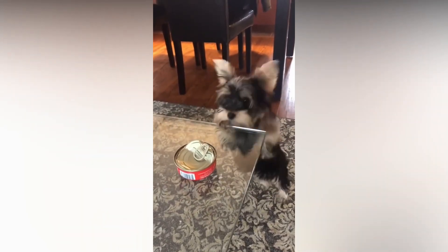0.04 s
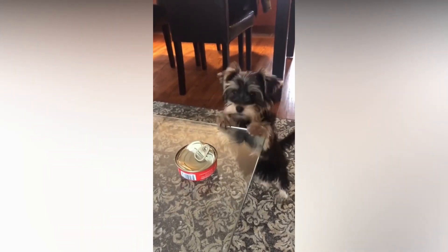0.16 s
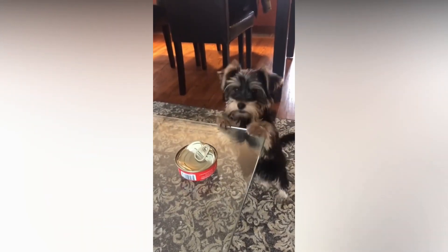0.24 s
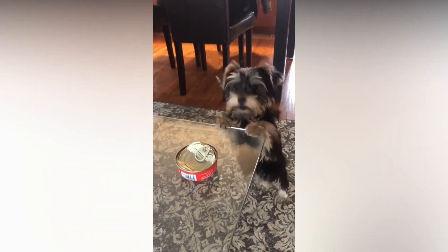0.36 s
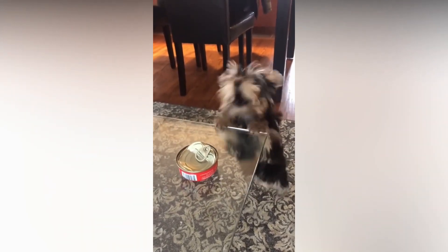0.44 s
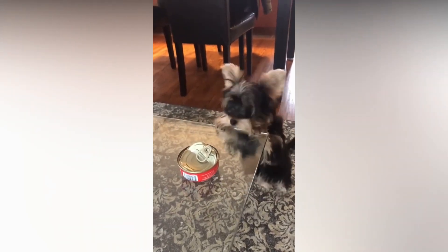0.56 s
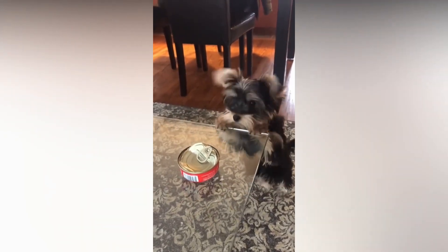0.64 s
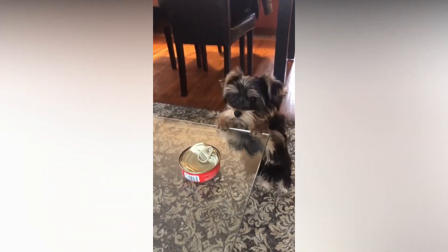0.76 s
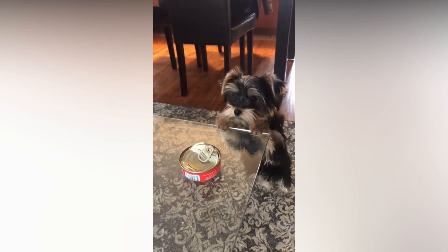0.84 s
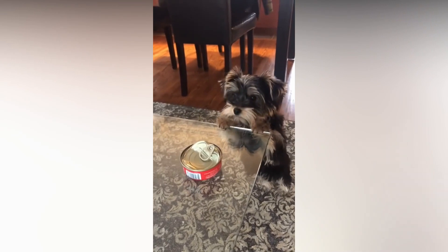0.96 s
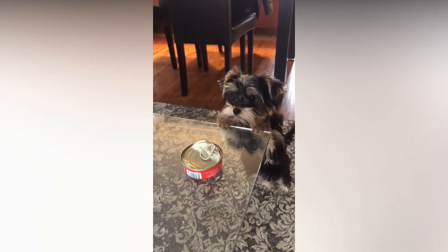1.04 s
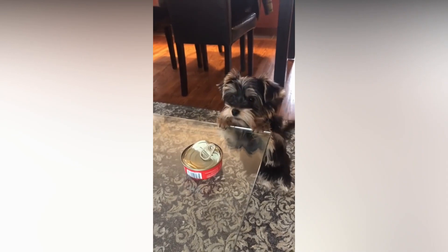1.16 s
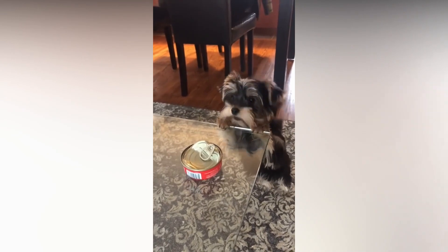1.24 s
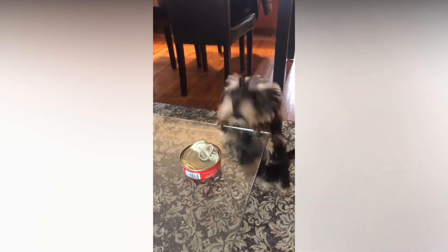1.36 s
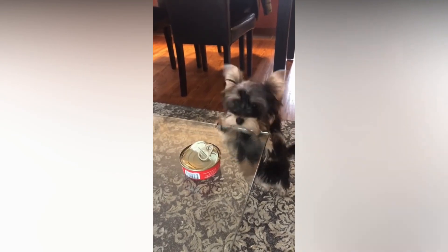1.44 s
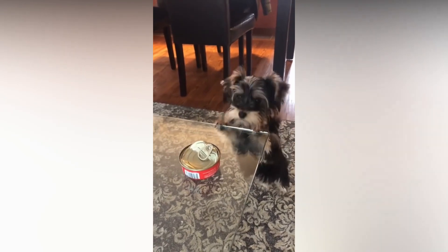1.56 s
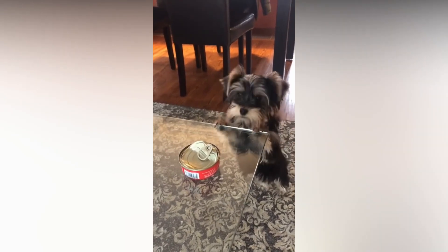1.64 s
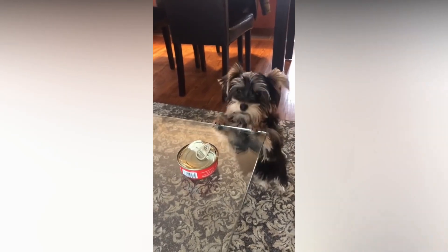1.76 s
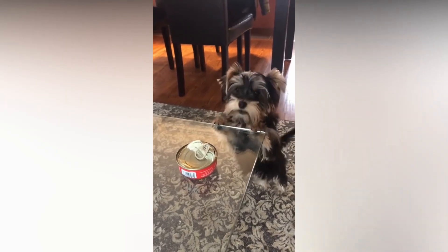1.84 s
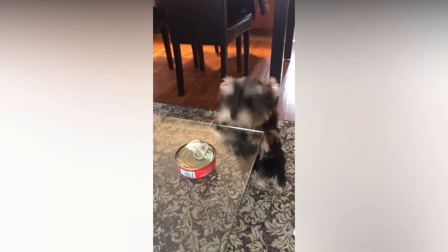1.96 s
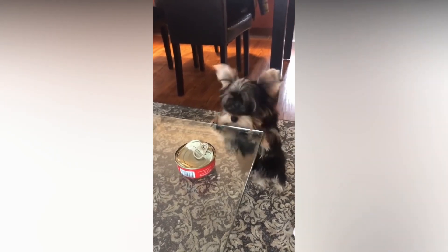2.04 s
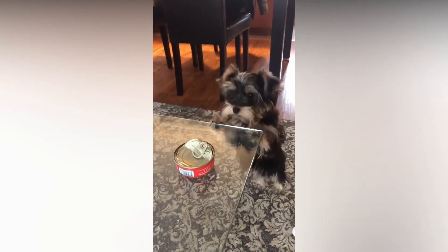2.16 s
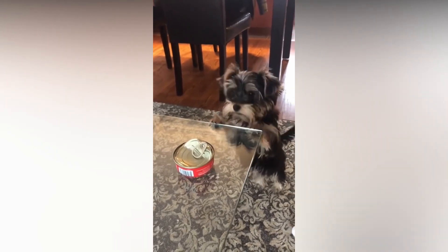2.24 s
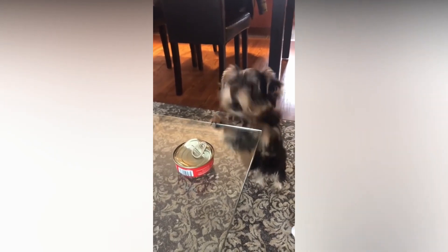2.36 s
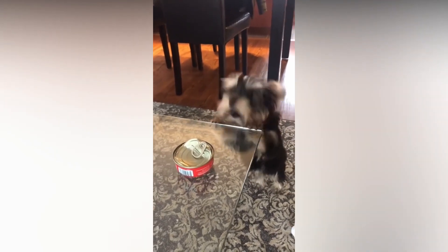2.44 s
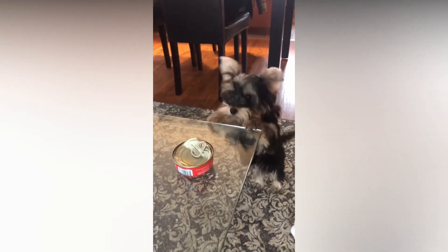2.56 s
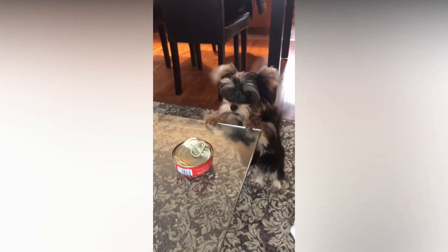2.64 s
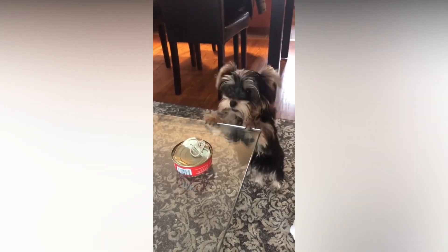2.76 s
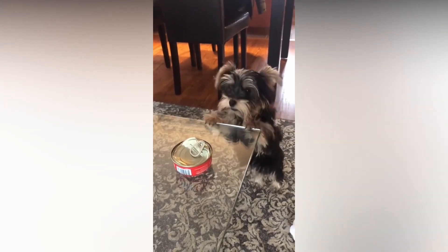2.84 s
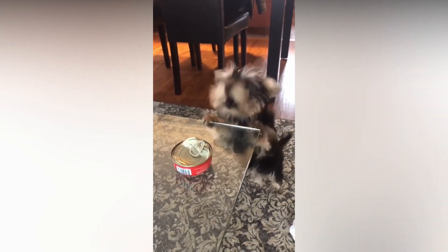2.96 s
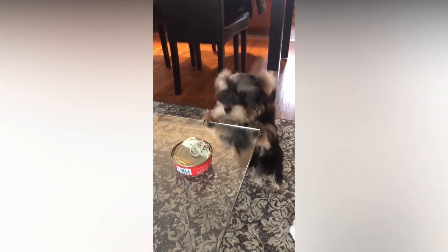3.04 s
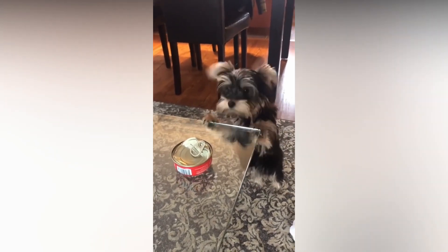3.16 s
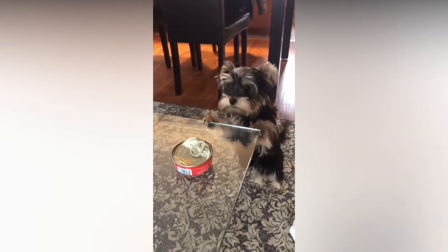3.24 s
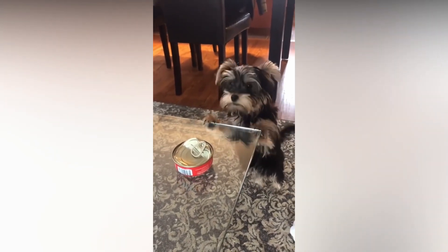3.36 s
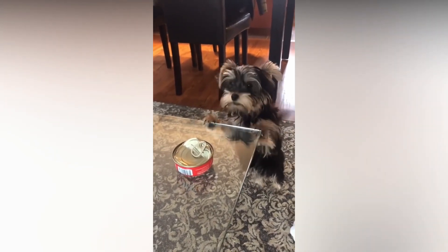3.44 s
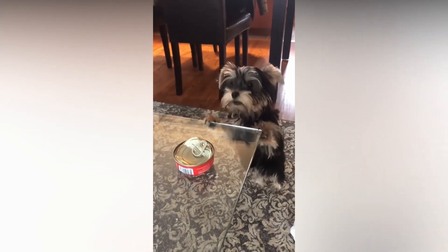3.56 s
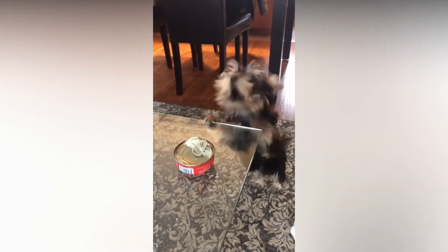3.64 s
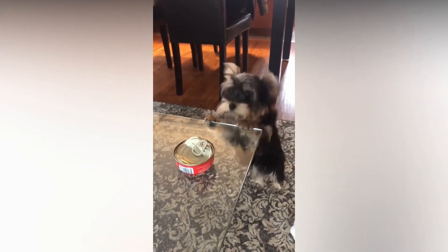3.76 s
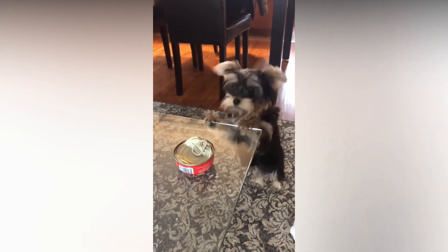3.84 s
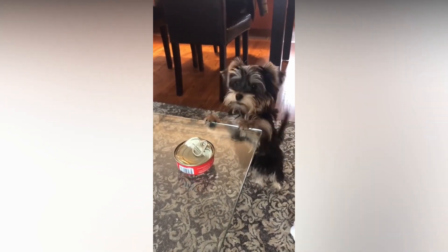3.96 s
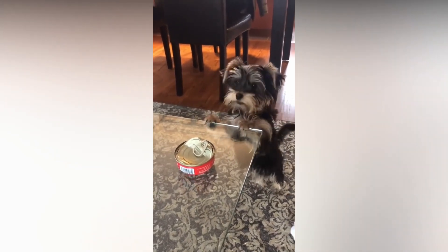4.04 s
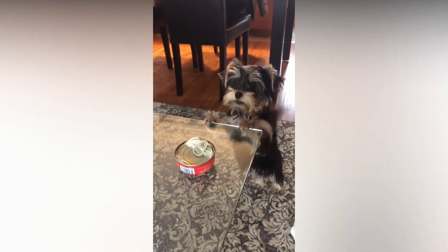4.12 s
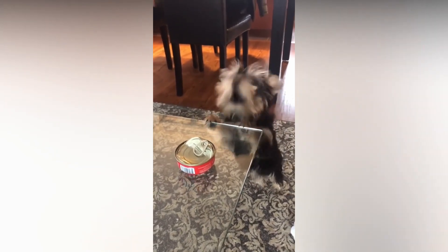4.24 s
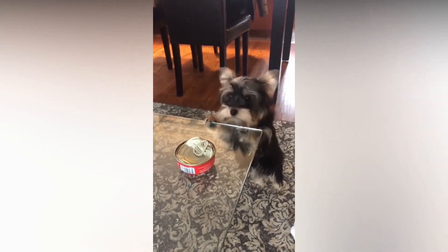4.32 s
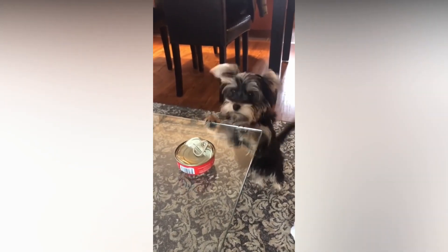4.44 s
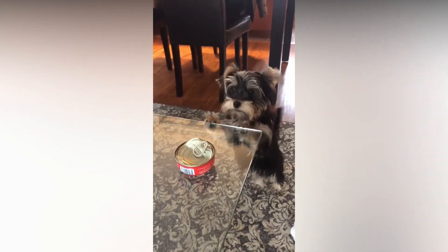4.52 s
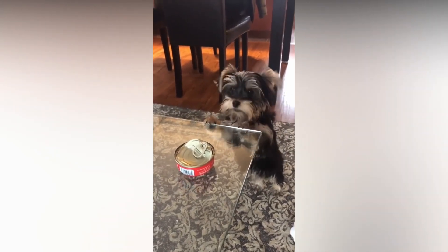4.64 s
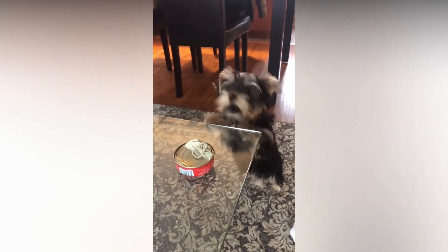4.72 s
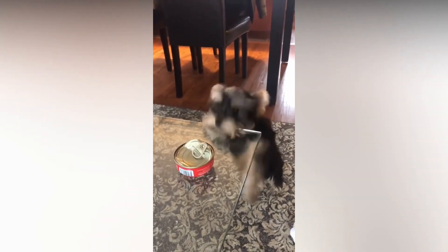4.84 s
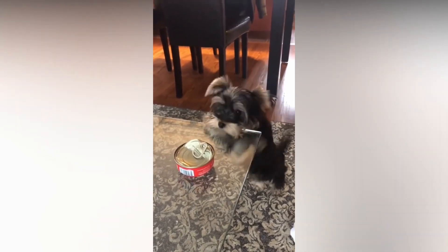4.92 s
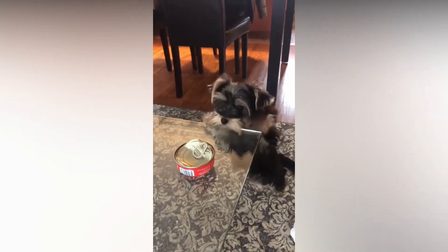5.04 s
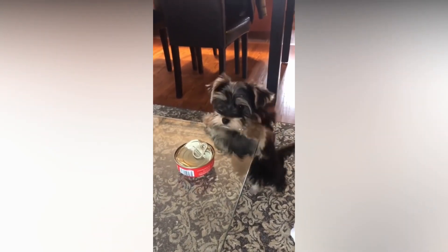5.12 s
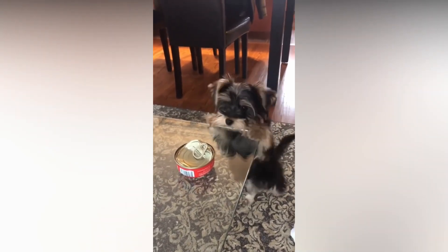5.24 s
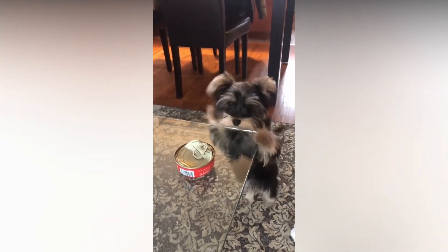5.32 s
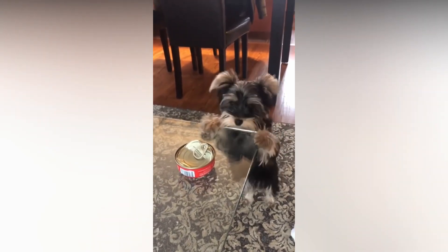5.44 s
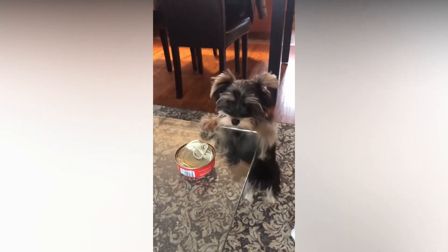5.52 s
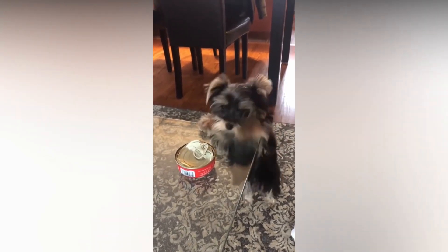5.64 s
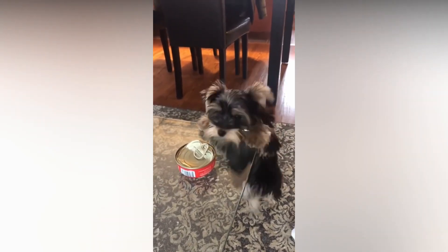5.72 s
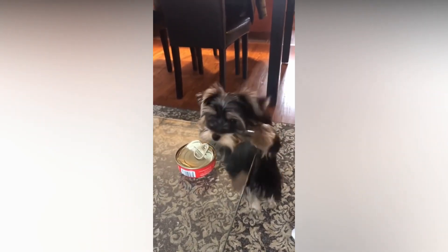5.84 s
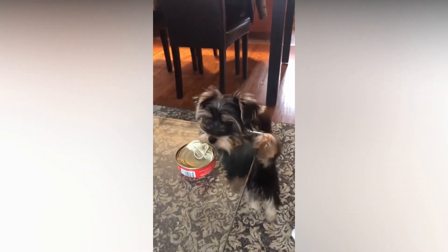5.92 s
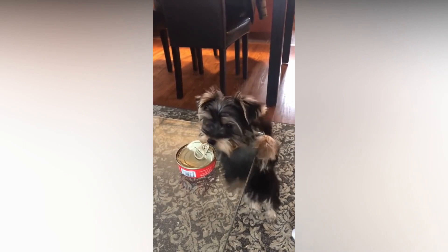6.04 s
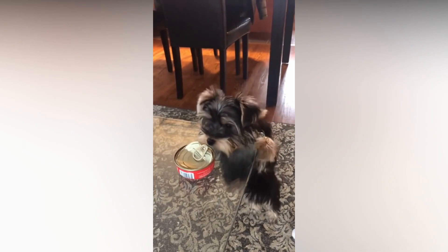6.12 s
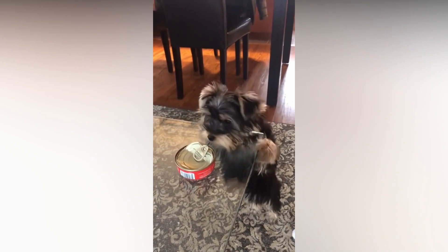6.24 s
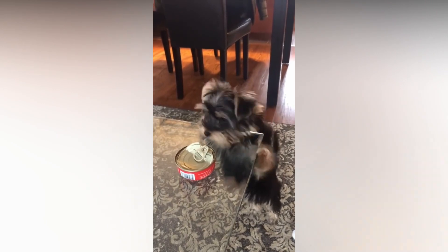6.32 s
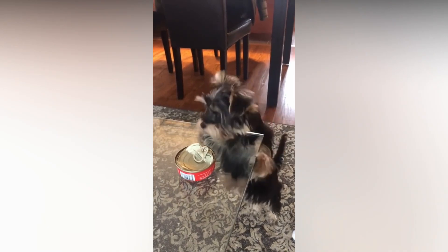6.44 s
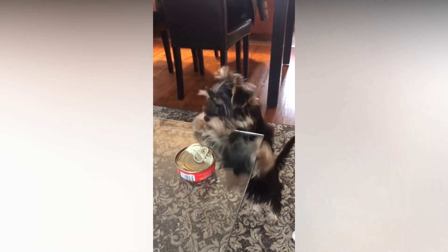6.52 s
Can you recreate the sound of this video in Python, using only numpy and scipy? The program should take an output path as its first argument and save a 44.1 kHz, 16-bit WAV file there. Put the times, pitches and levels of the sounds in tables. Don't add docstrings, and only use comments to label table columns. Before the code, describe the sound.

Piercing little barks spaced about half a second apart, close up indoors, followed by soft paw knocks on a rattling tabletop and light puffs of breath.

```python
import sys
import numpy as np
from scipy import signal
from scipy.io import wavfile
from scipy.ndimage import uniform_filter1d

SR = 44100
rng = np.random.default_rng(int(sys.argv[2]) if len(sys.argv) > 2 else 0)


def transcribe(signal):
    frames = np.atleast_2d(signal).T
    limited = np.clip(frames, -1, 1)
    pcm = np.round(limited * 32767).astype(np.int16)
    wavfile.write(sys.argv[1], SR, pcm)


def volts_from_decibels(level):
    exponent = np.asarray(level, float) / 20
    return 10 ** exponent


N = 290619
LEAD = SR // 8
TIME = (np.arange(N + LEAD) - LEAD) / SR


def rms_one(x):
    return x / np.sqrt(np.mean(x ** 2) + 1e-20)


def white():
    return rng.standard_normal(len(TIME))


def filtered(x, hz, kind):
    return signal.sosfilt(signal.butter(2, hz, kind, fs=SR, output="sos"), x)


def at_hz(points, hz, column=1):
    points = np.array(points)
    return np.interp(np.log(hz), np.log(points[:, 0]), points[:, column])


def stretch(rows, rise_s, fall_s):
    s, *columns = np.transpose(rows)
    span = slice(*np.searchsorted(TIME, [s[0] - rise_s, s[-1] + fall_s]))
    t = TIME[span]
    fade_in = np.clip((t - s[0]) / rise_s + 1, 0, 1)
    fade_out = np.clip((s[-1] - t) / fall_s + 1, 0, 1)
    return span, [np.interp(t, s, c) for c in columns], (fade_in * fade_out) ** 2


def wobble(hz):
    return rms_one(filtered(white(), hz, "low"))


def resonances(x, modes):
    out = 0
    for k, (hz, width, level_db) in enumerate(modes):
        r = np.exp(-np.pi * width / SR)
        b = [(1 - r * r) / 2, 0, (r * r - 1) / 2]
        a = [1, -2 * r * np.cos(2 * np.pi * hz / SR), r * r]
        out = out + (-1) ** k * volts_from_decibels(level_db) * signal.lfilter(b, a, x + 1e-18)
    return out


def bands(noise, gain):
    edges = 22 * 2 ** np.arange(0, 9.9, .5)
    out = 0
    for k, (lo, hi) in enumerate(zip(edges, edges[1:])):
        out = out + gain(np.sqrt(lo * hi)) * filtered(noise[k % 2], [lo, hi], "band")
    return out


# frequency in Hz, level in dB per Hz.
AIR_SPECTRUM = [(25, -20), (60, -3), (150, -7.5), (400, -13.5), (1200, -18), (3000, -26), (8000, -41.5),
                (15500, -56)]
HUM_HZ, HUM_DB, AIR_DB, HISS_DB = 53.7, -69.5, -70, -87
QUIET_FROM_S, LIFT_DB_PER_S = 5.24, 8.0


def background():
    hum_hz = HUM_HZ * (1 + 0.022 * wobble(4.4))
    hum = np.sin(2 * np.pi * np.cumsum(hum_hz) / SR) * volts_from_decibels(5.4 * wobble(6))
    air = rms_one(bands(rng.standard_normal((2, len(TIME))), lambda hz: volts_from_decibels(at_hz(AIR_SPECTRUM, hz))))
    faint = rms_one(resonances(white(), [(5000, 4000, 2.5), (9600, 4000, -5)]))
    lift = volts_from_decibels(LIFT_DB_PER_S * np.maximum(TIME - QUIET_FROM_S, 0))
    return lift * (volts_from_decibels(HUM_DB) * hum + volts_from_decibels(AIR_DB) * air) + volts_from_decibels(HISS_DB) * faint


SETTLE_S, SETTLE_DB, SETTLE_HZ = .02, -4.5, -25
LET_GO_S, LET_GO_DB, TIRE_DB_PER_S = 0.015, -4, -89.5
OCTAVE_START_DB, OCTAVE_DIP_DB, OCTAVE_DB_PER_S, OCTAVE_END_DB = -22, -33, 434, -7.5
TWELFTH_START_DB, TWELFTH_DB, TWELFTH_LATE_DB, TWELFTH_END_DB = -39.5, -29.5, -39.5, -55


def whistle_course(s, length, hz, last_hz, level_db):
    hold_s = length - SETTLE_S - LET_GO_S
    tired_db = level_db + TIRE_DB_PER_S * hold_s
    octave_db = OCTAVE_DIP_DB + OCTAVE_DB_PER_S * hold_s
    return [(s, hz + SETTLE_HZ, level_db + SETTLE_DB, OCTAVE_START_DB, TWELFTH_START_DB),
            (s + SETTLE_S, hz, level_db, OCTAVE_DIP_DB, TWELFTH_DB),
            (s + length - LET_GO_S, last_hz, tired_db, octave_db, TWELFTH_LATE_DB),
            (s + length, last_hz, tired_db + LET_GO_DB, octave_db + OCTAVE_END_DB, TWELFTH_END_DB)]


# multiple of the pitch, level in dB re fundamental.
WHISTLE_OVERTONES = [(4, -42), (5, -49), (6, -42), (7, -47), (8, -50.5), (11, -58), (12, -47), (14, -44.5)]
# start in seconds, length in seconds, settled pitch in Hz, last pitch in Hz,
# level in dB.
WHISTLES = [
    (-.06, 0.076, 1075, 1072, -4),
    (0.439, 0.076, 1110, 1110, -3.5),
    (1.324, 0.071, 1082, 1061, 0.5),
    (1.905, .062, 1141, 1142, 1),
    (2.392, 0.082, 1093, 1082, -3.5),
    (2.953, .078, 1122, 1086, -3),
    (3.65, 0.077, 1067, 1027, -2.5),
    (4.222, .08, 1089, 1043, -0.5),
    (4.761, .047, 1138, 1142, -2.5),
]


def whistle():
    out = np.zeros(len(TIME))
    waver = wobble(46)
    flicker = [wobble(18) for _ in range(4)]
    for yap in WHISTLES:
        span, (hz, level_db, octave_db, twelfth_db), fade = stretch(whistle_course(*yap), .008, .008)
        phase = 2 * np.pi * np.cumsum(hz * (1 + 0.0056 * waver[span])) / SR
        tone = volts_from_decibels(level_db) * np.sin(phase)
        tone += volts_from_decibels(octave_db) * np.sin(2 * phase + 4.47)
        tone += volts_from_decibels(twelfth_db) * np.sin(3 * phase)
        for k in range(4, 15):
            overtone_db = level_db + at_hz(WHISTLE_OVERTONES, k) + 6.5 * flicker[k % 4][span]
            tone += volts_from_decibels(overtone_db) * np.sin(k * phase + k * k)
        out[span] += np.sqrt(2) * fade * tone
    return out


# start in seconds, rise in seconds, hold in seconds,
# pulse rate after the rise in Hz, level in dB.
OPENINGS = [
    (0.399, .016, .03, 566.2, -7),
    (1.285, .016, 0.019, 577.3, -6.5),
    (1.87, .019, 0.0064, 918.5, -10),
    (2.367, .015, .002, 602.2, -10.5),
    (2.896, .012, .016, 398.2, -34.5),
    (2.909, .028, 0.018, 601.2, -11.5),
    (3.605, .015, .012, 568.6, -11.5),
    (4.183, .018, 0.02, 555.7, -11.5),
    (4.726, .017, .002, 574, -11),
]
WAKE_SHARE, SWELL_DB_PER_S, CLIMB_HZ_PER_S, HOLD_DB_PER_S = .55, 999.5, 4800, -200
SCOOP = .72
WAKE_ROUGH, RISEN_ROUGH, ROUGH_PER_S, OPEN_EVEN = .3, .32, 12.0, .9
# start in seconds, length in seconds,
# first rate in Hz, last rate in Hz, level in dB.
BREAKS = [
    (1.308, .04, 414.7, 419.8, -11),
    (1.893, .018, 493, 521.3, -8),
    (2.388, .025, 442.7, 500, -11),
    (3.635, .024, 540.3, 587, -6.5),
    (4.22, .018, 629.4, 561, -9.5),
    (4.744, .025, 425.2, 547.2, -9),
]
BREAK_IN_DB, BREAK_OUT_DB, BREAK_ROUGH, BREAK_EVEN = -5.5, -10, 0.44, 0.1
# start in seconds, length in seconds, pulse rate in Hz, level in dB,
# evenness 0-1 (below 1 the pulses go strong-weak).
CLOSINGS = [
    (-.004, .056, 517.3, -8, .75),
    (.487, 0.044, 435.6, -8, .8),
    (1.379, .06, 505.9, -9.5, .3),
    (1.956, .065, 421.9, -7.5, .8),
    (2.465, .058, 528.7, -12.5, .1),
    (3.009, .045, 527.7, -12, .1),
    (3.702, 0.063, 532, -11.5, .15),
    (4.288, .05, 490.4, -12, .3),
    (4.801, .037, 617.8, -6, .8),
    (4.832, 0.049, 544.7, -8, .3),
]
CATCH_S, CATCH_DB, CATCH_ROUGH, CLOSE_ROUGH = .016, -9.5, .55, .42
FADE_DB_PER_S, SAG_HZ_PER_S = -330, 3300


def chest_courses():
    for s, rise, hold, hz, level_db in OPENINGS:
        half_hz = hz * (WAKE_SHARE + SCOOP * (1 - WAKE_SHARE))
        half_db = level_db - (1 - SCOOP) * SWELL_DB_PER_S * rise
        yield [(s, WAKE_SHARE * hz, level_db - SWELL_DB_PER_S * rise, WAKE_ROUGH, OPEN_EVEN),
               (s + rise / 2, half_hz, half_db, RISEN_ROUGH, OPEN_EVEN),
               (s + rise, hz, level_db, RISEN_ROUGH, OPEN_EVEN),
               (s + rise + hold, hz + CLIMB_HZ_PER_S * hold, level_db + HOLD_DB_PER_S * hold,
                RISEN_ROUGH + ROUGH_PER_S * hold, OPEN_EVEN)]
    for s, length, hz, last_hz, level_db in BREAKS:
        yield [(s, hz, level_db + BREAK_IN_DB, BREAK_ROUGH, BREAK_EVEN),
               (s + length / 2, (hz + last_hz) / 2, level_db, BREAK_ROUGH, BREAK_EVEN),
               (s + length, last_hz, level_db + BREAK_OUT_DB, BREAK_ROUGH, BREAK_EVEN)]
    for s, length, hz, level_db, even in CLOSINGS:
        sag = SAG_HZ_PER_S * np.clip(1 - even, .05, 1)
        last_db = level_db + FADE_DB_PER_S * (length - CATCH_S)
        yield [(s, hz, level_db + CATCH_DB, CATCH_ROUGH, even),
               (s + CATCH_S, hz - sag * CATCH_S / 2, level_db, CLOSE_ROUGH, even),
               (s + length, hz - sag * length, last_db, CLOSE_ROUGH, even)]


# frequency in Hz, width in Hz, level in dB.
THROAT = [(1110, 252, 13.5), (1918, 370, 1.5), (2208, 413, 0), (2946, 1200, -10), (4640, 610, -26),
          (5470, 170, -25.5), (7340, 1000, -42.5), (12400, 2500, -31.5)]


def throat_gain(hz):
    return sum(volts_from_decibels(level_db) / (1 + (2 * (hz - centre) / width) ** 2) for centre, width, level_db in THROAT)


# frequency in Hz, width in Hz, lift in dB.
GAPING = [(5430, 900, 7), (1740, 160, 8)]
# frequency in Hz, width in Hz, lift in dB.
NARROWED = [(2320, 290, 5.5), (4605, 560, 6), (7170, 1100, 7.5)]
BITE_HZ, OPENING_BITE_DB, CLOSING_BITE_DB = 2680, 4, -8.5
BRIGHTEN = .75
NARROW_BREATH_DB = -30


def mouth_gains(hz, level_db, even, opening, bite):
    shift = 1 if opening else np.clip(1 + 0.0092 * (level_db + 12), .7, 1.1)
    muffle = 1 if opening else volts_from_decibels(-0.5 + .5 * (level_db + 9.5))
    gains = []
    for k in range(1, 31):
        f = k * hz
        gain = throat_gain(f / shift) * (f < 15800)
        if k % 2:
            gain = gain * np.clip(even, 0, 1)
        gain = gain * np.where(f > BITE_HZ, bite, 1) * np.where(f > 1450, muffle, 1)
        lift_db = sum(db / (1 + (2 * (f - centre) / width) ** 2)
                      for centre, width, db in (GAPING if opening else NARROWED))
        gains.append(gain * volts_from_decibels(lift_db))
    gains[0] *= 1 if opening else .2
    return gains


def chest():
    out = np.zeros(len(TIME))
    jitter = wobble(190)
    shimmer = [wobble(100) for _ in range(6)]
    breath = rms_one(resonances(resonances(white(), THROAT), [(1690, 1900, 0)]))
    bright = filtered(breath, BITE_HZ, "high")
    squeezed = rms_one(resonances(resonances(white(), NARROWED[1:]), NARROWED[1:]))
    for rows in chest_courses():
        span, (hz, level_db, rough, even), fade = stretch(rows, .002, 0.0041)
        rough = np.clip(rough, 0, 1)
        opening = hz[-1] > hz[0]
        effort_db = level_db - level_db.max()
        bite = volts_from_decibels(OPENING_BITE_DB + BRIGHTEN * effort_db if opening else CLOSING_BITE_DB)
        phase = 2 * np.pi * np.cumsum(hz * (1 + 0.056 * rough * jitter[span])) / SR
        gains = mouth_gains(hz, level_db, even, opening, bite)
        voiced = 0
        for k, gain in enumerate(gains):
            shake = 0.041 * k * (rough + 0.062) * shimmer[3 + k % 3][span]
            strength = gain * volts_from_decibels(7.5 * rough * shimmer[k % 3][span])
            voiced = voiced + strength * np.cos((k + 1) * phase + .6 * k * k + shake)
        voiced /= np.sqrt(np.sum(np.square(gains), axis=0) / 2)
        puffs = (breath[span] + (bite - 1) * bright[span]) * (1 + 0.29 * np.cos(phase))
        mix = np.sqrt(1 - 0.74 * rough ** 2) * voiced + (0.017 + 0.54 * rough ** 1.2) * puffs
        out[span] += volts_from_decibels(level_db) * fade * mix
        if not opening:
            out[span] += volts_from_decibels(level_db + NARROW_BREATH_DB) * fade * squeezed[span]
    return out


# frequency in Hz, width in Hz, level in dB.
TEETH = [(4466, 490, -6.5), (5460, 1300, -16.5), (7300, 1400, -7), (8800, 570, -7.5), (11000, 1100, -11.5),
         (12200, 1400, -0.5), (14300, 1100, -3.5), (15200, 900, -5)]


def teeth_hiss(voice):
    strength = np.sqrt(uniform_filter1d(voice ** 2, size=500) + 1e-12)
    flow = np.roll(strength ** 1.2, SR // 150)
    air = white()
    out = 0
    for hz, width, level_db in TEETH:
        spurt = volts_from_decibels(4.5 * wobble(22))
        once = resonances(air, [(hz, width, level_db)])
        out = out + spurt * resonances(once, [(hz, width, 0)])
    return flow * rms_one(out)


# frequency in Hz, t60 in seconds, level in dB.
ROOM_DECAY = [(100, .4, -1.5), (500, 0.53, -3.5), (980, 0.48, -1.5), (2320, 0.55, -2.5), (4768, 0.46, -3),
              (7500, 0.23, -1), (14000, 0.28, -6)]
ROOM_DB = -19.5


def room(x):
    t = np.arange(SR) / SR

    def decay(hz):
        return volts_from_decibels(at_hz(ROOM_DECAY, hz, column=2) - 60 * t / at_hz(ROOM_DECAY, hz))

    echoes = bands(rng.standard_normal((2, SR)), decay) * np.clip((t - .004) / 0.004, 0, 1)
    echoes = echoes / np.sqrt(np.sum(echoes ** 2)) * 2.0
    return x + volts_from_decibels(ROOM_DB) * signal.fftconvolve(x, echoes)[:len(x)]


# start in seconds, peak in dB, claw tick in dB re thud, size (1 = whole paw).
PAWS = [(0.119, -27.5, -18.5, 0.98), (0.93, -47.5, 2.5, 0.93), (1.126, -51.5, -16.5, 0.96),
        (5.129, -28, -28.5, 0.9), (5.197, -29.5, -26, 0.64), (5.273, -33, -13, 0.86),
        (5.36, -41, -15, 0.95), (5.421, -31.5, -3.5, 0.92), (5.49, -37, -15, 0.78),
        (5.685, -23.5, -12, 0.93), (5.706, -43, -49, 0.71), (5.794, -40.5, -13.5, 0.97),
        (5.861, -41, -6.5, 0.98), (6.09, -47.5, -15.5, 0.98), (6.305, -24.5, -14.5, 0.95),
        (6.577, -37.5, -25, 0.98)]
# frequency in Hz, level in dB, t60 in seconds.
TABLE_MODES = [(96, -9.5, 0.098), (148, -4, 0.12), (232, -5, 0.18), (267, -7.5, 0.4), (340, -9.5, 0.066),
               (676, -9.5, 0.079), (1200, -17.5, 0.043)]
RATTLE_DB, RATTLE_HZ = 2.5, 30


def paws():
    out = np.zeros(len(TIME))
    spread_db = rng.normal(0, 1.5, (len(PAWS), len(TABLE_MODES)))
    claw = [(2590, 2000, -4.0), (4030, 330, 7.0), (6540, 2000, -5.5), (13300, 2400, -10.5)]
    bright = resonances(white(), claw)
    dull = filtered(white(), [350, 1600], "band")
    rattle = volts_from_decibels(RATTLE_DB * wobble(RATTLE_HZ))
    for (s, peak_db, tick_db, size), extras_db in zip(PAWS, spread_db):
        at = round(s * SR) + LEAD
        span = slice(at, min(at + SR // 3, len(out)))
        age = np.arange(span.stop - at) / SR
        thud = 0
        for (hz, level_db, t60), extra_db in zip(TABLE_MODES, extras_db):
            ring = np.sin(2 * np.pi * hz / size * age)
            thud = thud + volts_from_decibels(level_db + extra_db - 60 * age / t60) * ring
        thud = thud * rattle[span] * (1 - np.exp(-age / 0.0018))
        tick = bright[span] * volts_from_decibels(tick_db - 60 * age / 0.14)
        knock = dull[span] * volts_from_decibels(0.45 * tick_db - 60 * age / 0.18)
        out[span] += volts_from_decibels(peak_db) * (0.34 * thud + 0.81 * tick + 0.61 * knock)
    return out


# start in seconds, length in seconds, level in dB.
PANTS = [
    (5.185, 0.14, -51),
    (5.491, 0.043, -54.5),
    (5.627, 0.065, -47),
    (5.803, 0.033, -52.5),
    (5.931, 0.0414, -54.5),
    (6.214, 0.049, -72.5),
    (6.501, 0.14, -65),
]
# frequency in Hz, width in Hz, level in dB.
PANT_MOUTH = [(930, 240, -6.5), (2260, 400, -0.5), (3000, 500, -6), (5460, 2500, -20)]
GASP_S, GASP_DB = .02, -55


def panting():
    gasps = [(yap[0] - GASP_S, GASP_S + .004, GASP_DB) for yap in OPENINGS]
    flow = 0
    for s, length, level_db in list(PANTS) + gasps:
        flow = flow + volts_from_decibels(level_db) * np.sin(np.pi * np.clip((TIME - s) / length, 0, 1)) ** 1.6
    air = resonances(white(), PANT_MOUTH)
    return flow * rms_one(resonances(air, [(2450, 5900, -3.0), (13240, 2900, -5.5)]))


def scene():
    high, low = whistle(), chest()
    puppy = high + low + volts_from_decibels(-25) * teeth_hiss(0.18 * high + low) + panting()
    return (room(puppy + paws()) + background())[None, LEAD:]


def roll_off(x):
    return signal.sosfilt(signal.butter(12, 15970, fs=SR, output="sos"), x)


PORT_HZ, PORT_WIDTH_HZ, PORT_DB = 14700, 3000, 1
CEILING, RELEASE_DB_PER_S = 0.98, 151


def record(dry):
    ported = dry + resonances(dry, [(PORT_HZ, PORT_WIDTH_HZ, PORT_DB)])
    over_db = np.maximum(20 * np.log10(np.abs(ported) / CEILING + 1e-9), 0)
    fall_db = RELEASE_DB_PER_S * np.arange(N) / SR
    held_db = np.maximum.accumulate(over_db + fall_db, axis=1) - fall_db
    limiter_gain = volts_from_decibels(-uniform_filter1d(held_db, size=88, axis=1))
    limited = np.clip(ported * limiter_gain, -1, 1)
    return roll_off(limited)


dry = scene()
out = record(dry)
transcribe(out)
```